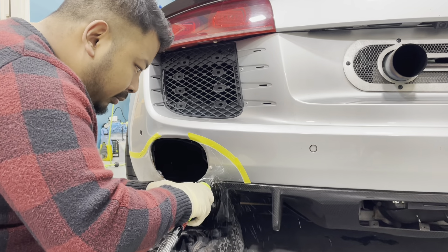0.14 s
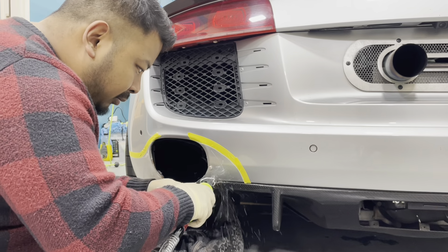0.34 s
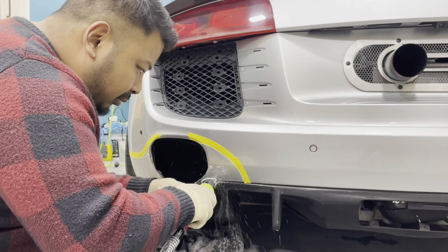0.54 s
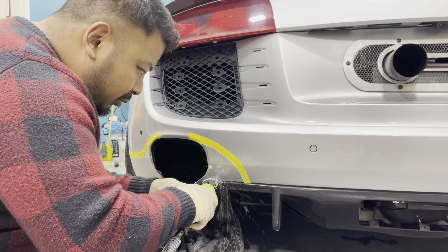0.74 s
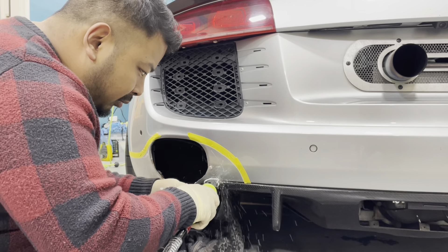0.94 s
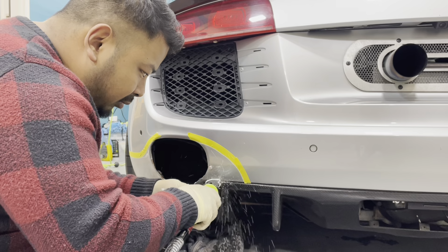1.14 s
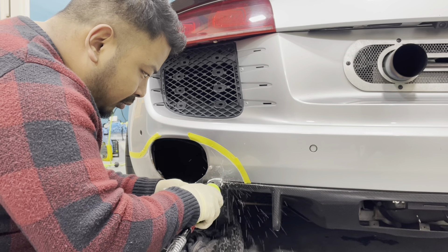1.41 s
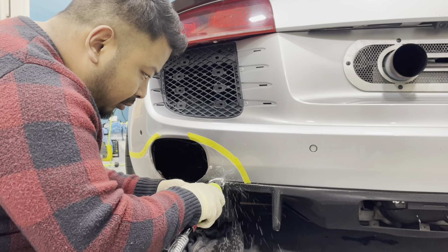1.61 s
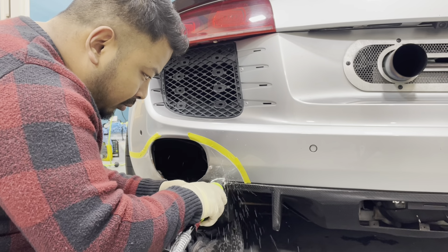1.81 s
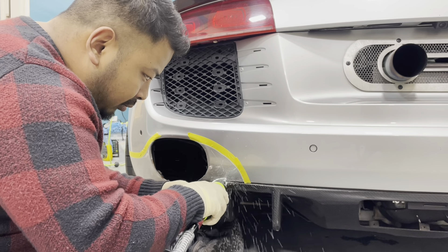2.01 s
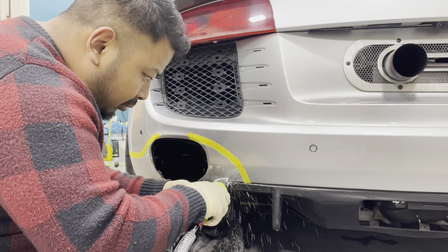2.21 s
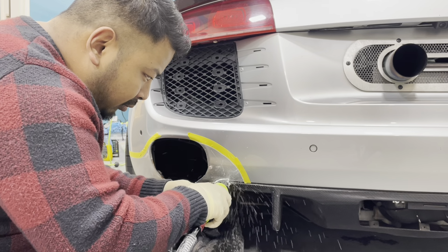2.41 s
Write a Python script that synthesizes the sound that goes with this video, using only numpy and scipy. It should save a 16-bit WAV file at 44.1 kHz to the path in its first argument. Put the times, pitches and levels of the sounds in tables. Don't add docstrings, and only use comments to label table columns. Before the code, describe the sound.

An air-driven saw buzzes steadily as it cuts through a plastic car bumper, close up

```python
import sys
import numpy as np
from scipy import signal
from scipy.fft import rfft, irfft, next_fast_len
from scipy.io import wavfile
from scipy.ndimage import uniform_filter1d

SR = 44100
rng = np.random.default_rng(int(sys.argv[2]) if len(sys.argv) > 2 else 0)


def voltage_ratio(decibels):
    exponent = np.asarray(decibels, float) / 20
    return 10 ** exponent


def store_wav(level_fs):
    pcm = np.round(np.clip(np.atleast_2d(level_fs), -1, 1) * 32767)
    wavfile.write(sys.argv[1], SR, pcm.T.astype(np.int16))


N = 112454


def table(rows, hz):
    rows = np.array(rows, float)
    return np.interp(np.log(hz + 1), np.log(rows[:, 0]), rows[:, 1])


def slow(rate, count):
    points = rng.standard_normal((count, 400))
    place = np.arange(N) / SR * rate
    k = place.astype(int)
    part = 0.5 - 0.5 * np.cos(np.pi * (place % 1))
    return points[:, k] * (1 - part) + points[:, k + 1] * part


def noise(colour, like):
    a, b = rfft(rng.standard_normal((2, N)))
    hz = np.fft.rfftfreq(N, 1 / SR)
    like = np.clip(table(like, hz), 0, 1)
    second = like * a + np.sqrt(1 - like ** 2) * b
    pair = irfft(np.array([a, second]) * voltage_ratio(table(colour, hz)), N)
    return pair / pair.std()


def shop(chatter_db):
    # f/Hz, level/dB
    hum_colour = [(20, -54), (44, -30), (55, -18), (100, -2), (300, 12), (1000, -17)]
    rumble_db = 0.57 * (chatter_db - chatter_db.mean())
    hum_db = -55 + rumble_db + 2.1 * slow(16, count=1)
    return voltage_ratio(hum_db) * noise(hum_colour, [(100, 0.99)])


def exhaust(phase):
    # f/Hz, level/dB
    air_colour = [(1500, -21.5), (3000, -10), (4200, -3.5), (5500, -6.5), (7000, -6), (8600, -6.5),
                  (9500, -6), (16000, -15)]
    # f/Hz, likeness (0 to 1)
    air_like = [(3000, 0.9), (7000, 0.8), (14000, 0.85)]
    puff_depth, fade_strokes = 0.69, 0.6
    puff = np.exp(-(phase / (2 * np.pi) % 1) / fade_strokes)
    puff = uniform_filter1d(puff, size=30)
    gate = 1 - puff_depth + 2 * puff_depth * puff
    flicker_db = 1.1 * slow(22, count=1)
    sway_db = 0.2 * slow(6.1, count=1)
    return voltage_ratio(-33.5 + flicker_db + sway_db) * gate * noise(air_colour, air_like)


def snags(t, chatter_db, scrape_db):
    # t/s, length/s, chatter level/dB, scraping gain/dB
    catches = [(.158, .025, -48, -3), (.26, .06, -43, 1), (0.777, .04, -33, 6), (.87, .035, -40, 5),
               (.96, .02, -45, 0), (1.04, 0.042, -33, 4), (1.113, .04, -34, 6), (1.19, 0.047, -27.5, 7),
               (1.27, .045, -34, 4), (1.327, .03, -32, 8), (1.376, 0.023, -37, -3), (1.44, .02, -37, 3),
               (1.488, .03, -36, -4), (1.59, 0.046, -36, 8), (1.648, 0.055, -31, 0)]
    chatter, extra_db = voltage_ratio(chatter_db), 0
    for at, length, catch_db, gain_db in catches:
        bump = np.exp(-((t - at) / (length / 2)) ** 2)
        chatter = chatter + voltage_ratio(catch_db) * bump
        extra_db = extra_db + gain_db * bump
    return 20 * np.log10(chatter), scrape_db + extra_db


def scrape(phase, scrape_db):
    # f/Hz, level/dB
    scrape_colour = [(40, -53), (150, -4.5), (400, -14), (900, -5), (1500, 0), (2400, 0), (4000, -8),
                     (7000, -16.5)]
    stroke_number = (phase / (2 * np.pi)).astype(int)
    bite = voltage_ratio(2.2 * rng.standard_normal(600))[stroke_number]
    gate = 1 + 1.26 * bite * (1 - np.cos(phase))
    loudness = voltage_ratio(-42.5 + scrape_db - scrape_db.mean())
    return loudness * gate * noise(scrape_colour, [(100, 0.88)])


def partial(order, db, phase):
    # t/s, length/s, centre f/Hz, gain/dB
    swells = [(1.65, .06, 291, -3), (.72, .2, 385, 3), (1.22, .16, 390, -6), (.65, .06, 573, -2.5),
              (2.47, .08, 585, 3.5), (.15, .06, 745, -3), (.43, .16, 760, 8), (.6, .15, 763, -7.5),
              (1.55, .2, 783, 2.5), (1.77, .1, 875, 3), (.28, .15, 943, 5), (1.0, .08, 972, -11),
              (2.33, .24, 975, 5.5), (2.16, .13, 1165, -9), (.25, .06, 1318, -3), (.65, .05, 1338, -5),
              (1.75, .05, 1360, -11), (.9, .2, 1550, 3), (1.6, .2, 1565, -8), (2.05, .1, 1835, 6),
              (.55, .04, 1905, -8), (1.4, .12, 1960, 3), (1.91, .11, 2040, 5.5), (.12, .14, 2050, 3.5),
              (.64, .06, 2100, 10), (1.25, .1, 2145, 4), (2.3, .08, 2145, 8), (.9, .14, 2325, 6),
              (1.3, .15, 2343, 5), (1.56, .09, 2348, 10), (2.25, .06, 2340, -10), (1.02, .2, 2922, 17),
              (2.45, .08, 2928, 12), (.72, .13, 3070, 9), (.98, .28, 3305, 12), (2.45, .08, 3320, 9),
              (.38, .12, 3980, 2), (2.47, .08, 1170, -3.5), (1.7, .05, 1168, 3), (2.14, .06, 583, -1.5)]
    swell_width_hz = 75
    high_from_order = 14
    wander_rate_hz, jitter_rate_hz = 9, 60
    jitter_rad, port_wander_rad = 0.014, 0.038
    spread_rad = 0.42
    is_high = order > high_from_order

    drift = slow(wander_rate_hz * (2 if is_high else 1), count=2)
    own = slow(wander_rate_hz, count=2)
    shake = slow(jitter_rate_hz, count=1)
    t = np.arange(N) / SR
    hz = order * np.gradient(phase) * SR / (2 * np.pi)
    for at, length, centre_hz, gain_db in swells:
        if abs(np.log(hz.mean() / centre_hz)) < 0.06:
            nearness = ((t - at) / length) ** 2 + ((hz - centre_hz) / swell_width_hz) ** 2
            db = db + gain_db * np.exp(-nearness)
    wander_db = 2.2 if is_high else 0.08 * (order - 0.9)
    start = spread_rad * order ** 2 + (np.pi + spread_rad / 2) * (order % 1)
    tremble = jitter_rad * shake + port_wander_rad * (own + drift[1])
    turn = order * phase + start + min(order, high_from_order - 3) * tremble
    return np.sqrt(2) * voltage_ratio(db + wander_db * drift[0]) * np.sin(turn)


def strokes(hz, phase, tone_db, steady_db, chatter_db):
    # slow level/dB, middle speed level/dB, fast level/dB, chattering level/dB
    stroke_lines = [(0.5, 0.5, 0, 0.5), (-10.5, -15, -14.5, -17.5), (-5.5, -9, -9, -2.5),
                    (-12, -21, -15, -17), (-6.5, -26, -9, -12), (-5, -9, -4, -11), (-7, -7, -12.5, -18),
                    (-14, -25, -16, -30), (-10, -6.5, -7, -13), (-13, -11, -19.5, -16),
                    (-11.5, -23.5, -23.5, -37), (-17, -28, -16, -11.5), (-36, -26, -28.5, -29),
                    (-28, -19, -25, -23), (-36, -31, -30, -26), (-21.5, -25, -30.5, -23),
                    (-26, -37, -29, -36), (-23.5, -30, -23.5, -29), (-33, -33, -24, -31),
                    (-25, -31, -20, -28), (-36, -22.5, -27, -20), (-20, -35, -25, -33),
                    (-26, -24.5, -28, -29), (-18.5, -35, -27, -51)]
    stroke_rates = (185.5, 190, 194.9)
    # multiple of the stroke rate, level/dB
    chatter_lines = [(0.5, -27.5), (1.5, -11), (2.5, -37), (3.5, -18.5), (4.5, -16), (5.5, -11),
                     (6.5, -15.5), (7.5, -15), (8.5, -12), (9.5, -22), (10.5, -15.5), (11.5, -18),
                     (12.5, -19.5), (13.5, -18), (14.5, -16.5), (15.5, -20.5), (16.5, -28), (17.5, -37),
                     (18.5, -31), (19.5, -30), (20.5, -26), (21.5, -28), (22.5, -28), (23.5, -36)]
    full_chatter_db, chatter_lines_db = -21.5, -19
    share = np.clip(voltage_ratio(steady_db - full_chatter_db), 0, 1)
    known = len(stroke_lines)
    out = 0
    for order, line_db in enumerate(stroke_lines, 1):
        free_db = np.interp(hz, stroke_rates, line_db[:3])
        mixed_db = (1 - share) * free_db + share * line_db[3]
        out = out + partial(order, tone_db + mixed_db, phase)
    for order in range(known + 1, 34):
        line_db = -32 - 0.49 * (order - known) + 2.5 * rng.standard_normal()
        out = out + partial(order, tone_db + line_db, phase)
    for below, (_, line_db) in enumerate(chatter_lines):
        line_db = chatter_lines_db + line_db + chatter_db - full_chatter_db
        out = out + partial(below + 0.5, line_db, phase)
    return out


def scene():
    # t/s, stroke rate f/Hz, buzz level/dB, chatter level/dB, scraping level/dB
    saw_run = [(.03, 184.4, -21.5, -50, -40), (.3, 188.8, -18.2, -50, -45), (.45, 190, -18, -50, -50),
               (.68, 191.2, -18.8, -52, -46), (.77, 193.6, -19, -46, -46), (.85, 193.4, -19, -48, -45),
               (1.1, 195.3, -19.3, -50, -47), (1.2, 194.7, -19.4, -48, -46), (1.5, 196.2, -19.6, -50, -50),
               (1.58, 196, -19.8, -40, -48), (1.65, 194.3, -20, -30, -44), (1.71, 195.5, -20, -29, -44),
               (1.75, 193.5, -20.2, -23, -46), (1.85, 194.6, -20, -23, -47), (2.08, 192.7, -20, -24, -44),
               (2.3, 195.2, -20.3, -25, -45), (2.38, 195, -20, -29, -46), (2.4, 195.2, -19.6, -50, -52)]
    t = np.arange(N) / SR
    run = np.array(saw_run, float).T
    hz, tone_db, steady_db, scrape_db = (np.interp(t, run[0], column) for column in run[1:])
    chatter_db, scrape_db = snags(t, steady_db, scrape_db)
    phase = 2 * np.pi * np.cumsum(hz) / SR
    saw = strokes(hz, phase, tone_db, steady_db, chatter_db)
    return saw + scrape(phase, scrape_db) + exhaust(phase) + shop(chatter_db)


def two_ports(dry):
    # f/Hz, level/dB
    port_levels = [(200, 1.5), (380, 4), (700, 5), (1290, 1.5), (2380, 0), (4400, 1.5)]
    # f/Hz, phase/rad
    port_leads = [(300, 0), (800, 0.4761), (1900, 0), (2500, 1.13), (4500, 0.51), (5100, 0.67)]
    # f/Hz, half turns
    treble_turns = [(5700, .28), (7550, 1), (9100, 1.43), (11000, 2), (12600, 2.5), (14500, 3),
                    (16000, 3.3)]
    size = next_fast_len(N + 2048)
    hz = np.fft.rfftfreq(size, 1 / SR)
    levels = [(50, 0)] + port_levels + [(6000, 0)]
    leads = port_leads + [(f, np.pi * turns) for f, turns in treble_turns]
    half = voltage_ratio(table(levels, hz) / 2) * np.exp(0.5j * table(leads, hz))
    return irfft(rfft(dry, size) * np.array([half, 1 / half]), size)[:, :N]


def drop_weak_bands(ports):
    # low f/Hz, high f/Hz
    sum_lost = [(7000, 8250), (13300, 17000)]
    # low f/Hz, high f/Hz
    difference_lost = [(10450, 11650), (15900, 17000)]
    # low f/Hz, high f/Hz, threshold (higher is rarer)
    flicker_bands = [(7000, 7300, .9), (13300, 13500, -1.2), (13500, 13650, -.3), (13650, 13800, .6),
                     (15200, 15500, .1), (15500, 15850, -.9)]
    # start t/s, end t/s
    top_gaps = [(.045, .085), (.3, .335), (.635, .89), (1.08, 1.2), (1.26, 1.33), (1.59, 1.64)]
    hz, t = np.fft.rfftfreq(N, 1 / SR), np.arange(N) / SR

    def inside(bands):
        return sum((hz > band[0]) & (hz < band[1]) for band in bands)

    mid = rfft(ports[0] + ports[1]) / 2
    side = rfft(ports[0] - ports[1]) / 2
    kept = irfft(mid * (1 - inside(sum_lost)), N)
    for band, chance in zip(flicker_bands, slow(30, count=len(flicker_bands))):
        if band[0] > 15000:
            chance = chance - 9 * sum((t > start) & (t < end) for start, end in top_gaps)
        is_on = uniform_filter1d(1.0 * (chance > band[2]), size=300)
        kept = kept + is_on * irfft(mid * inside([band]), N)
    side = irfft(side * (1 - inside(difference_lost)), N)
    return np.array([kept + side, kept - side])


def top_cut(x):
    return signal.sosfilt(signal.butter(12, 16040, fs=SR, output="sos"), x)


def record(dry):
    ports = two_ports(dry)
    mix = drop_weak_bands(ports)
    return top_cut(mix)


dry = scene()
out = record(dry)
store_wav(out)
```